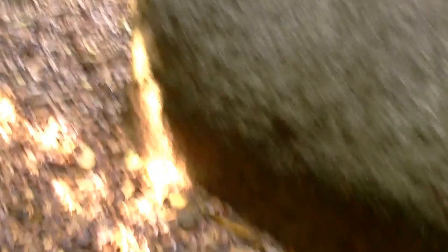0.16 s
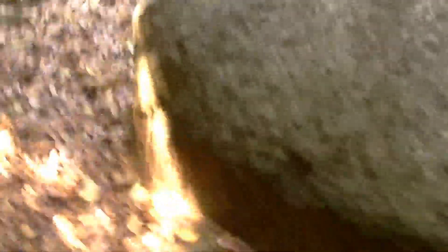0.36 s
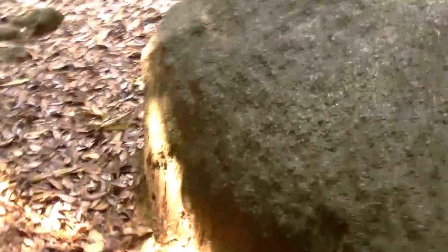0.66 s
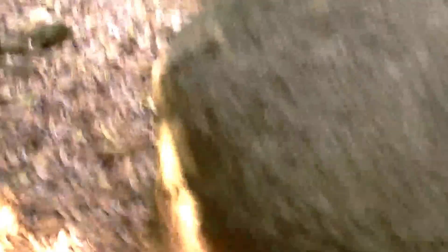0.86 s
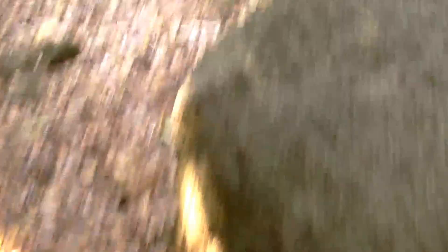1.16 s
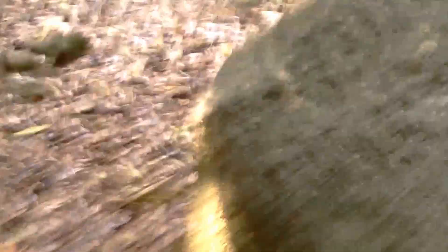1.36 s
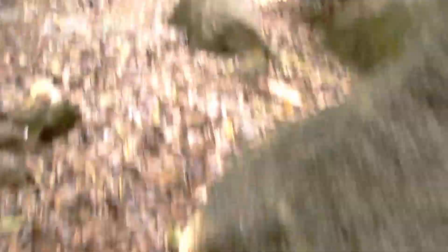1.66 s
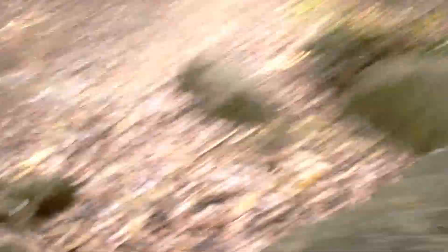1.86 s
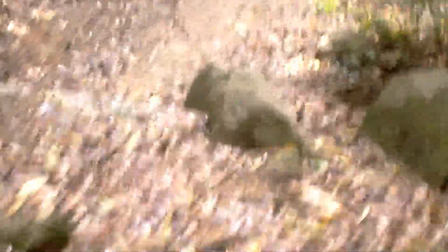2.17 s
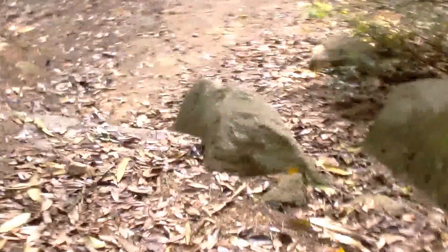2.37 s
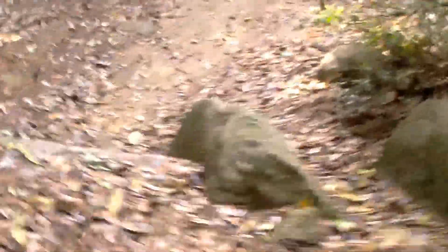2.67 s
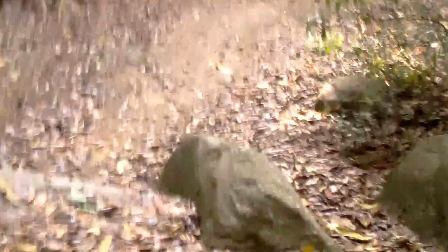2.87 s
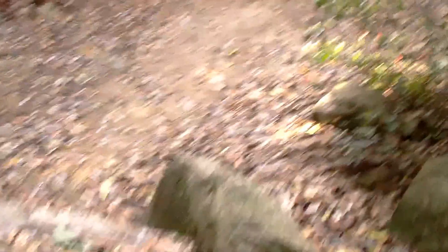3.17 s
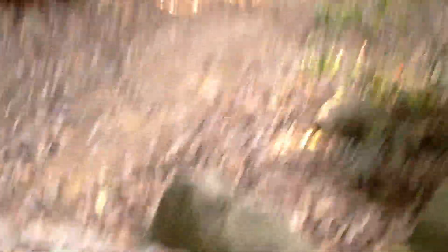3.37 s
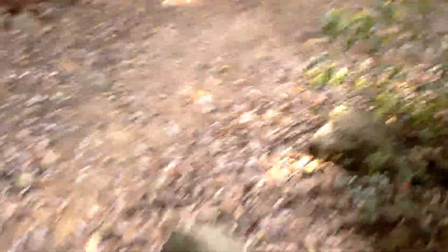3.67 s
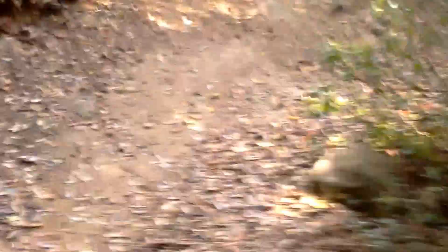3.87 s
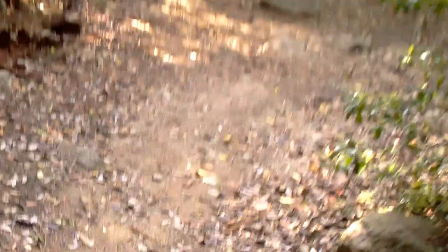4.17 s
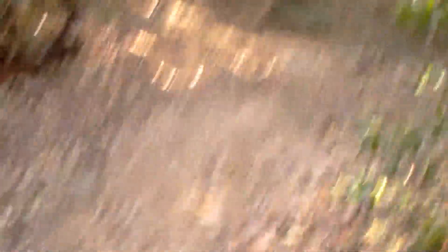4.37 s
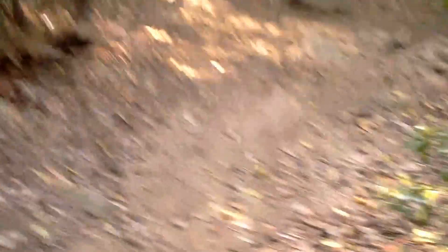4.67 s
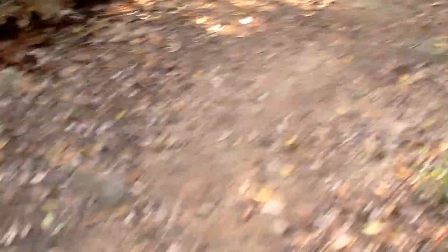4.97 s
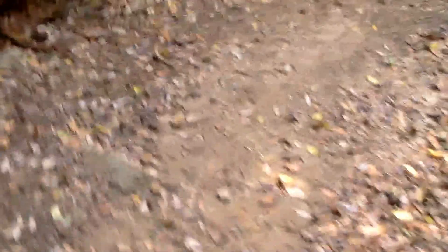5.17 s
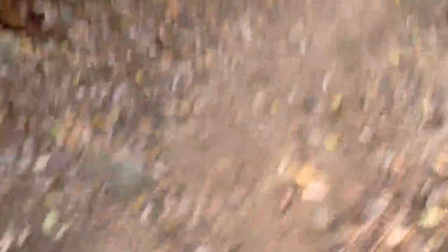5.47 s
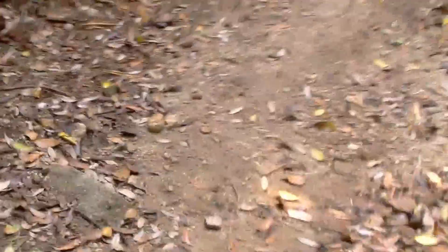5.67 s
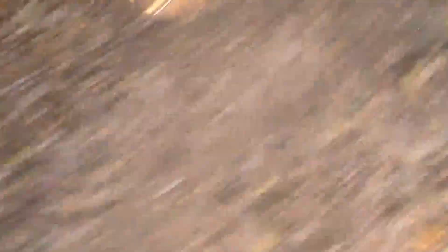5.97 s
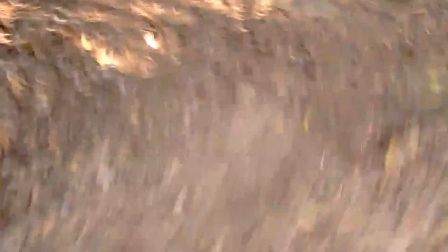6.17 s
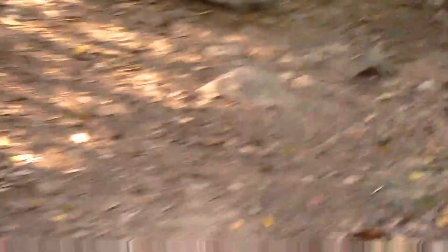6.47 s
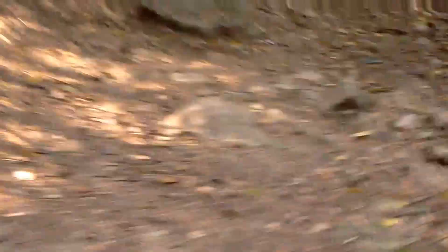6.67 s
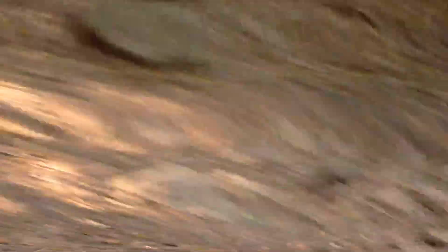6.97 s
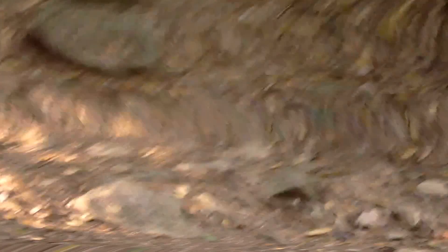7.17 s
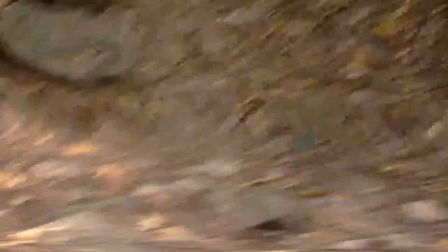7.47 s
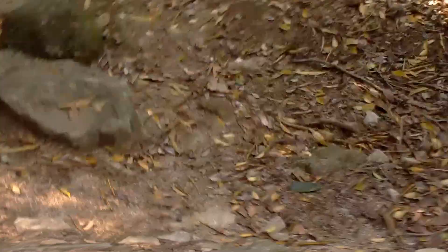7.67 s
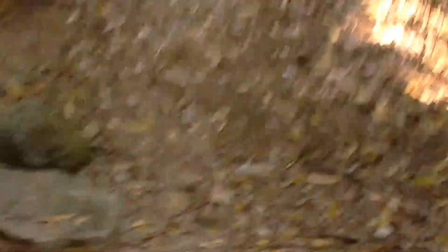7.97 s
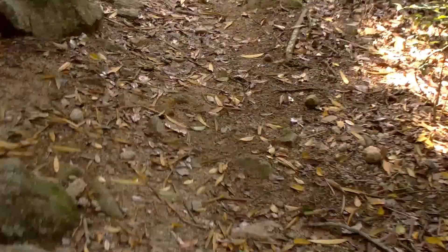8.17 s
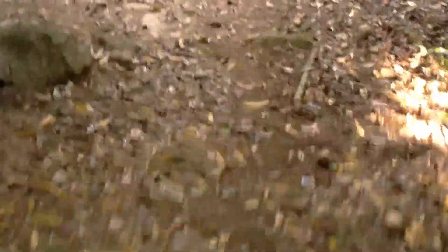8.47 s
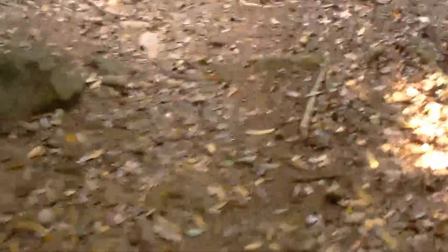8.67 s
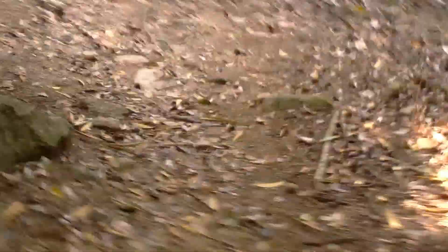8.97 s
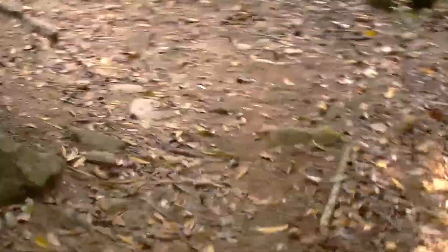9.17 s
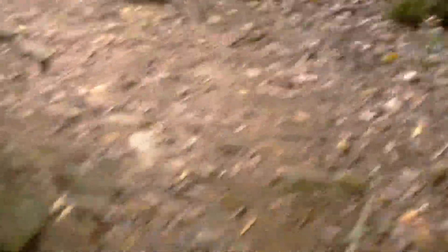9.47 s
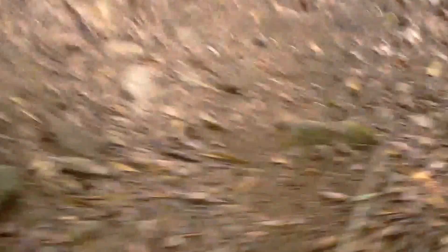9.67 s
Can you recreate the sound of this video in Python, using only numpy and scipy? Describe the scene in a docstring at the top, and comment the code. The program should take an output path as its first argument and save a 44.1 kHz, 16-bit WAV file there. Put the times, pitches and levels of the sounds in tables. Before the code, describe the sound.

A hand-held microphone moves just above walking feet in quiet woods. Steps are irregular, first sparse, then steady, crunching leaves and gritty soil with light scuffs between them. Stones knock and twigs tick. One short bird squeak comes early; distant chips come later, with a few tiny bright metallic rattles. The loudest stony steps land about two thirds through. Soft hush, low buffeting and a short, faint echo from the trees.

```python
"""A quick walk down a forest trail

Each sole thuds, grinds grit and crushes dry leaves, all built from clouds of tiny ringing fractures and noise.
Stones knock, twigs snap and a small piece of metal gear clinks: short dying bursts of coloured noise.
A bird squeaks once, from wavering harmonics and rasp; another chips further off, from brief tone pulses.
Filtered noise makes the hush of the wood and the rumble of air on the swinging hand-held microphone."""
import sys
import numpy as np
from scipy import signal
from scipy.fft import rfft, irfft, next_fast_len
from scipy.io import wavfile
from scipy.ndimage import uniform_filter1d

SR = 44100
rng = np.random.default_rng(int(sys.argv[2]) if len(sys.argv) > 2 else 0)


def file_out(sig):
    """Save sig as 16-bit WAV at sys.argv[1]."""
    # one column per channel
    cols = np.atleast_2d(sig).T
    # limit, then scale
    lim = np.clip(cols, -1, 1)
    pcm = np.round(lim * 32767).astype(np.int16)
    wavfile.write(sys.argv[1], SR, pcm)


N = 433061   # samples, about 9.8 s
TIME = np.arange(N) / SR   # seconds


def from_db(db):
    """Decibels to gain."""
    return 10 ** (np.asarray(db) / 20)


def rms_one(x):
    """Scale to unit rms."""
    return x / np.sqrt(np.mean(x ** 2) + 1e-20)


def in_time(rows):
    """Each column of a curve after the first (seconds), at every sample."""
    s, *columns = np.transpose(rows)
    return [np.interp(TIME, s, column) for column in columns]


def colour(x, points):
    """Filter x to a spectrum of (Hz, dB) points; minimum phase, so nothing sounds early."""
    length = x.shape[-1]
    size = 2 * next_fast_len(length // 2 + 2048)
    hz, db = np.transpose(points)
    bins_hz = np.arange(size // 2 + 1) * SR / size
    gain_db = np.interp(np.log(bins_hz + 1), np.log(hz), db)
    # folding the cepstrum turns the gain curve into a causal filter
    cepstrum = irfft(np.log(from_db(gain_db)))[:size // 2]
    cepstrum[1:] *= 2
    response = np.exp(rfft(cepstrum, size))
    return irfft(rfft(x, size) * response, size)[..., :length]


def drift(rate, at=TIME):
    """Smooth chance with spread 1 that takes a new random value rate times a second."""
    return rms_one(np.interp(at * rate, np.arange(12000), rng.standard_normal(12000)))


def ring(x, hz, sharpness):
    """Let x excite one resonance; a sharper one rings for more cycles."""
    return signal.lfilter(*signal.iirpeak(hz, sharpness, fs=SR), x)


def add(track, s, sound):
    """Mix a sound into a track at time s."""
    start = max(round(s * SR), 0)
    part = track[..., start:start + sound.shape[-1]]
    part += sound[..., :part.shape[-1]]


def stereo(mid, side):
    """Left and right from mid and side."""
    return np.array([mid + side, mid - side])


# Tone of the quiet wood. Each row: frequency in Hz, gain in dB.
HUSH_SPECTRUM = [(60, 2), (200, -2.5), (450, -4), (800, -10.5), (1700, -13.5), (2600, -11.5), (5500, -15),
                 (10500, -26), (16000, -25)]
# Tone of air on the microphone. Each row: frequency in Hz, gain in dB.
RUMBLE_SPECTRUM = [(10, -0.5), (22, 1), (38, 0), (52, -2), (75, -14), (130, -43), (400, -55)]


def background(sole_db):
    """The steady hush of the wood, and air buffeting the microphone, more as each step jolts it."""
    hush = rms_one(colour(rng.standard_normal((2, N)), HUSH_SPECTRUM))
    air = rms_one(colour(rng.standard_normal((2, N)), RUMBLE_SPECTRUM))
    jolt_db = uniform_filter1d(sole_db, size=5000)
    air = air * from_db(-37.5 + 0.36 * (jolt_db - jolt_db.mean()))
    return from_db(-48) * stereo(hush[0], 0.5 * hush[1]) + stereo(air[0], 0.15 * air[1])


WOOD_T60_S = 0.79   # time for the longer echo to fall by 60 dB


def wood(x, early_t60_s, late, width):
    """Trunks scatter a quick echo and a thin longer one, different on each side."""
    t = TIME[:SR]
    fading = from_db(-60 * t / early_t60_s) + late * from_db(-60 * t / WOOD_T60_S)
    echoes = rng.standard_normal((2, SR)) * fading * (t > .008)   # the first echo needs 8 ms
    energy = np.sum(echoes[0] ** 2)   # of the middle
    echoes = stereo(echoes[0], width * echoes[1])
    return signal.fftconvolve(x[None], echoes / np.sqrt(energy), axes=1)[:, :N]


# The other bird's chips. Each row: start in seconds, level in dB, pitch in Hz.
CHIP_NOTES = [(6.842, -18.5, 2250), (6.864, -21, 2350), (6.869, -19, 2220), (6.875, -27, 2400),
              (6.881, -29, 2300)]
# Its far calls, blurred by the trees. Each row: middle in seconds, level in dB before the wavering and trim.
BLURRED_CALLS = [(.39, -48.5), (5.22, -50), (6.86, -43.5), (7.19, -42), (8.22, -49)]


def other_bird(chip_s, call_hz, call_width_hz, call_s):
    """Clicking chips are brief tone pulses; from far away they smear into a narrow band of noise."""
    track, t = np.zeros(N), TIME[:SR // 20]
    pulse = (t / chip_s) ** 2 * np.exp(2 - 2 * t / chip_s)   # peaks at chip_s
    for s, db, hz in CHIP_NOTES:
        add(track, s, from_db(db) * pulse * np.sin(2 * np.pi * hz * t))
    edges_hz = [call_hz - call_width_hz / 2, call_hz + call_width_hz / 2]
    band = signal.butter(2, edges_hz, "band", fs=SR, output="sos")
    swell = sum(from_db(db) * np.exp(-((TIME - s) / call_s) ** 2) for s, db in BLURRED_CALLS)
    waver = from_db(9.6 * drift(110) - 3.5)
    return track + swell * waver * rms_one(signal.sosfilt(band, rng.standard_normal(N)))


# The near bird's squeak. Each row: time in seconds, pitch in Hz before the wavering,
# level in dB before flutter and trim, roughness from 0 to 1.
SQUEAK_CURVE = [(.41, 1516, -50.5, 0.2), (.433, 1720, -37, 0.17), (.453, 1767, -25, 0.15),
                (.47, 1818, -28, 0.03), (.487, 1844, -24.5, 0.05), (.497, 1585, -29, .5),
                (.51, 1293, -29, 0.55), (.525, 943, -36, 0.7), (.535, 850, -51, 0.7)]
# Tone of its throat. Each row: frequency in Hz, gain in dB.
THROAT_SPECTRUM = [(1700, -10), (2700, -13), (3650, 0.5), (4400, -3), (5400, -16.5), (7200, -12),
                   (9000, -23), (10900, -17), (12700, -38.5), (14600, -24)]


def near_bird():
    """A fluttering squeak rises and slides down hoarsely, its harmonics passing through the throat's peak."""
    pitch_hz, db, roughness = in_time(SQUEAK_CURVE)
    on = (TIME > SQUEAK_CURVE[0][0]) & (TIME < SQUEAK_CURVE[-1][0])
    waver = (0.007 + .025 * roughness) * drift(1100)
    pitch_hz = (pitch_hz * (1 + waver))[on]
    phase = 2 * np.pi * np.cumsum(pitch_hz) / SR
    throat_hz, throat_db = np.transpose(THROAT_SPECTRUM)
    voice = np.zeros(N)
    for k in range(2, 9):   # harmonics, without the fundamental
        voice[on] += from_db(np.interp(k * pitch_hz, throat_hz, throat_db)) * np.sin(k * phase)
    # air through the same throat
    rasp = rms_one(colour(rng.standard_normal(N), [(800, -45)] + list(THROAT_SPECTRUM))) * on
    flutter_db = 2.5 * np.sin(2 * np.pi * 64 * TIME)
    return (voice + .6 * roughness * rasp) * from_db(db + flutter_db + 1.2)


BIRD_LAG_S, BIRD_PAN_DB = .00003, 1.1   # the near bird sits a little to the left


def from_left(x):
    """The sound reaches the right port a little later and weaker."""
    late = np.interp(TIME - BIRD_LAG_S, TIME, x)
    return np.array([x, late]) * from_db([[BIRD_PAN_DB / 2], [-BIRD_PAN_DB / 2]])


# A tap on the hand-held body, close to its left port. One row: start in seconds, level in dB before colouring.
TAP = (6.279, -14)


def body_tap(decay_s):
    """A short dull burst of noise that reaches the left port only."""
    track, t = np.zeros(N), TIME[:SR // 10]
    add(track, TAP[0], from_db(TAP[1]) * np.exp(-t / decay_s))
    dull = [(100, -11), (450, 3), (1000, -14), (3000, -10), (8000, -33)]
    left = track * rms_one(colour(rng.standard_normal(N), dull))
    return np.array([left, 0 * left])


# Touches of the metal gear. Each row: start in seconds, level in dB before colouring and trim.
CLINK_TOUCHES = [(1.9722, -23.5), (7.117, -17), (7.125, -37), (8.1429, -25), (9.126, -22)]
# Tone of its rattle. Each row: frequency in Hz, gain in dB.
CLINK_SPECTRUM = [(6000, -14), (9700, -11), (10400, 1.5), (10650, -7), (10880, 6), (11200, -8.5),
                  (16000, -9)]


def clinks():
    """Each touch sets the small metal piece rattling brightly for a moment: noise through its resonances."""
    shake, t = np.zeros(N), TIME[:SR // 4]
    for s, db in CLINK_TOUCHES:
        add(shake, s, from_db(db) * (np.exp(-t / 0.0058) + 0.11 * np.exp(-t / 0.022)))
    return from_db(12.0) * colour(shake * rng.standard_normal(N), CLINK_SPECTRUM)


# Heels, stones and twigs. Each row: start in seconds, ring in Hz, then the levels in dB of
# thump, knock and crack, before each layer's trim.
CONTACTS = [(0.0148, 1770, -57, -44, -42), (0.124, 1300, -26.5, -21.5, -35.5),
            (0.163, 3120, -42.5, -32.5, -45), (0.1794, 12000, -62, -56.5, -53),
            (0.7656, 190, -37.5, -41, -69), (0.9902, 337, -38, -41, -37.5), (1.019, 1460, -42, -35.5, -50),
            (1.3264, 257, -29, -47.5, -46.5), (1.3465, 1180, -47, -28.5, -24.5),
            (1.6239, 3960, -68, -30.5, -41), (1.861, 1250, -30.5, -32, -28), (1.9255, 2400, -38, -32, -36),
            (2.3736, 720, -25.5, -22, -39), (2.484, 5500, -53.5, -42, -31.5),
            (2.777, 4050, -35.5, -32, -38), (3.1278, 415, -33.5, -40, -64), (3.3634, 1470, -30, -24, -39),
            (3.903, 442, -31, -38, -42), (4.0262, 1150, -45, -17.5, -37), (4.0797, 1410, -53, -24, -50.5),
            (4.1185, 12000, -56, -58, -42), (4.4992, 423, -35, -42, -38.5), (4.5593, 1220, -29, -28, -30),
            (5.007, 457, -27.5, -35, -42), (5.062, 1150, -36, -21.5, -29), (5.3768, 5660, -55, -66, -31),
            (5.4797, 2540, -47, -19.5, -25), (5.508, 212, -25.5, -25, -36), (5.899, 3400, -60, -36, -26.5),
            (5.9822, 3650, -63, -30.5, -26.5), (5.9944, 1710, -52.5, -28.5, -32.5),
            (6.1202, 3900, -51, -34.5, -42), (6.279, 470, -25.5, -20.5, -26), (6.3, 530, -23, -35, -44),
            (6.5093, 716, -24.5, -15, -19.5), (6.5292, 1140, -23, -16, -39), (6.621, 1070, -48, -28.5, -36),
            (6.7201, 375, -21, -46, -54), (6.9485, 900, -21, -18, -42), (7.4661, 770, -29, -27.5, -45),
            (7.5946, 766, -36, -22.5, -33), (7.6272, 960, -48, -30, -55), (8.029, 1120, -31.5, -25.5, -38),
            (8.57, 1090, -26, -26.5, -30), (8.9176, 9000, -56, -50, -35), (8.9572, 4500, -55.5, -51, -16.5),
            (9.0038, 1750, -48, -24.5, -26.5), (9.058, 1700, -35.5, -32, -32), (9.076, 620, -31, -32, -38),
            (9.2119, 370, -26, -22, -33), (9.271, 1910, -59.5, -38.5, -39), (9.371, 6000, -54, -43, -41),
            (9.5581, 1150, -24.5, -20.5, -46), (9.8081, 1770, -61, -34, -30)]


def blows(column, spectrum, first_s, scatter_s, scatter):
    """A sharp contact, then a spray of smaller ones as the ground gives; levels are rms over the first 10 ms."""
    track, t = np.zeros((2, N)), TIME[:4096]
    for row in CONTACTS:
        spray = rng.standard_normal((2, len(t))) * (np.exp(-t / first_s) + scatter * np.exp(-t / scatter_s))
        spray[:, 0] += 7   # the sharp contact
        spray += 3.75 * ring(spray, row[1], 4.5)   # the struck thing rings
        blow = colour(spray, spectrum)
        blow /= np.sqrt(np.sum(blow[:, :SR // 100] ** 2, axis=1, keepdims=True) / (SR // 100))
        add(track, row[0], blow * from_db(row[column]))
    return track


# Tones of the three kinds of contact. Each row: frequency in Hz, gain in dB.
THUMP_SPECTRUM = [(40, -7), (100, 0), (250, 1.5), (420, -2), (700, -8), (2000, -30.5)]
KNOCK_SPECTRUM = [(200, -26), (500, 0), (1100, 1), (1600, -4), (2400, -7), (4000, -17), (9000, -36)]
CRACK_SPECTRUM = [(1000, 2.5), (2400, 1), (3600, 5.5), (5200, 2.5), (7000, -5.5), (10500, -6), (16000, -11)]


def stones_and_twigs():
    """Heavy contacts thump, stones knock and twigs crack, the first burst of each shorter than the one before."""
    thump = blows(2, THUMP_SPECTRUM, first_s=0.0037, scatter_s=0.017, scatter=0.21)
    knock = blows(3, KNOCK_SPECTRUM, first_s=0.0035, scatter_s=0.012, scatter=0.28)
    crack = blows(4, CRACK_SPECTRUM, first_s=0.0029, scatter_s=0.014, scatter=0.22)
    return from_db(2.0) * thump + knock + from_db(1.5) * crack


# Footfalls, about two a second. Each row: time in seconds, rise in seconds, press in seconds, then levels in dB of
# sole thud, grit, leaves and the rustle under the standing foot, before each layer's offsets and unevenness.
FOOTFALLS = [(0.163, 0.012, 0.036, -43, -34.0, -35, -48.5), (1.309, 0.015, 0.027, -31, -29, -28.5, -47.0),
             (1.846, 0.035, 0.018, -25.5, -23.5, -24.5, -51.5),
             (2.319, 0.026, 0.056, -34, -29.0, -31.5, -45.0), (2.838, 0.03, 0.025, -46, -32.5, -28, -52.0),
             (3.331, 0.049, 0.108, -43.5, -32, -31.0, -45.5),
             (3.997, 0.047, 0.031, -33.5, -26.5, -27.5, -48.0), (4.556, 0.012, 0.033, -32, -24, -26, -50.5),
             (5.014, 0.029, 0.101, -35.5, -28.5, -32.5, -50.5),
             (5.474, 0.042, 0.046, -34.5, -31, -29.0, -48.0),
             (6.189, 0.01, 0.022, -31.5, -25.5, -22.5, -42.0),
             (6.506, 0.008, 0.046, -21, -18, -20.5, -42.0),
             (6.943, 0.031, 0.117, -32.5, -25.5, -28.5, -44.0),
             (7.461, 0.014, 0.075, -35.5, -27.5, -34.0, -46.0),
             (8.01, 0.045, 0.07, -53, -30.5, -34.5, -48.0), (8.493, 0.04, 0.116, -35.5, -32, -37.5, -50.5),
             (8.938, 0.03, 0.055, -29.5, -27.5, -24.5, -48.0),
             (9.559, 0.018, 0.035, -29.5, -23.5, -37.0, -42.0)]
# Lighter touches between them, as a toe pushes off or a shoe brushes by. Each row: middle in seconds,
# half length in seconds, then levels in dB of sole thud, grit and leaves, before unevenness and trim.
LIGHT_TOUCHES = [(0.089, 0.075, -44, -41.5, -47), (0.248, 0.025, -31.0, -39, -51.5),
                 (0.294, 0.015, -32.5, -41, -46.5), (0.695, 0.055, -50, -39, -54.5),
                 (0.985, 0.052, -39.5, -38, -50.5), (1.098, 0.046, -43, -46.5, -51.5),
                 (1.258, 0.034, -56.5, -39.5, -48.5), (1.415, 0.046, -31.5, -34.5, -34.0),
                 (1.511, 0.041, -37.0, -42, -44.5), (1.808, 0.024, -49, -40.5, -35.5),
                 (1.925, 0.038, -31, -36.5, -33.5), (2.101, 0.048, -40.5, -40.5, -40.5),
                 (2.424, 0.043, -39.5, -36, -33), (2.498, 0.011, -36.5, -37, -34.5),
                 (2.652, 0.026, -43, -39.5, -48.5), (2.795, 0.035, -53, -38, -35.0),
                 (2.965, 0.058, -43.5, -50, -41.5), (3.182, 0.042, -38.5, -37, -53.5),
                 (3.492, 0.028, -37, -39.5, -37.5), (3.571, 0.052, -40.5, -49, -40.5),
                 (3.712, 0.03, -45.5, -41.5, -53.0), (3.889, 0.032, -37, -35.0, -30.0),
                 (4.09, 0.043, -37.5, -46, -35.5), (4.357, 0.016, -54, -47, -48.0),
                 (4.666, 0.065, -32.5, -35, -42.5), (4.786, 0.042, -36, -43.5, -54.0),
                 (5.193, 0.035, -35.5, -52, -43.0), (5.63, 0.069, -50, -38, -40.5),
                 (5.817, 0.008, -49, -43.5, -45), (6.006, 0.046, -60, -55, -39.0),
                 (6.251, 0.027, -31, -26, -43), (6.366, 0.041, -33, -38, -51),
                 (6.625, 0.04, -48.0, -29, -31.5), (6.725, 0.022, -21.5, -30.0, -44.0),
                 (6.764, 0.014, -29, -31, -35.0), (7.138, 0.047, -24, -31.5, -37.0),
                 (7.318, 0.011, -31.5, -36.5, -52), (7.603, 0.02, -50, -28.0, -40.0),
                 (7.657, 0.035, -51, -40.5, -42.5), (7.82, 0.054, -41, -49, -54.0),
                 (8.145, 0.056, -37, -42, -40.0), (8.249, 0.021, -40.5, -52, -47.0),
                 (8.654, 0.049, -42, -45.5, -54.5), (9.085, 0.033, -44, -34, -40.0),
                 (9.152, 0.038, -47, -36.5, -36.5), (9.235, 0.032, -31.5, -38.0, -48.5),
                 (9.372, 0.035, -52, -42, -42.0), (9.687, 0.059, -31, -36, -55)]
# the crunch climbs RISE_DB in a step's rise time, sags as the litter packs down and dies as the foot comes to rest
RISE_DB, SAG_DB_PER_S, UNLOAD_DB_PER_S = 21, 21, 364.5
# the litter rustles on while the foot stands on it and falls still when it lifts
STANCE_S, LIFT_DB_PER_S = .7, 107


def tread(layer, rustle_db, rest_db, uneven_db, uneven_per_s):
    """Level in dB of a ground layer (0 sole, 1 grit, 2 leaves): steps load, press and rustle; scuffs swell and fade."""
    t = TIME[::20]   # a coarse clock is enough for levels
    power = from_db(rest_db) ** 2 + np.zeros(len(t))
    for s, rise_s, press_s, *layers_db, standing_db in FOOTFALLS:
        age = np.maximum(t - s, 0)
        load = RISE_DB * np.minimum(t - s, 0) / rise_s
        press = layers_db[layer] - SAG_DB_PER_S * age - UNLOAD_DB_PER_S * np.maximum(age - press_s, 0)
        rustle = standing_db + rustle_db - LIFT_DB_PER_S * np.maximum(age - STANCE_S, 0)
        power += from_db(load + press) ** 2 + from_db(load + rustle) ** 2
    for s, half_s, *layers_db in LIGHT_TOUCHES:
        power += (from_db(layers_db[layer]) * np.exp(-((t - s) / half_s) ** 2)) ** 2
    uneven = uneven_db * drift(uneven_per_s, t)   # the ground gives way unevenly
    return np.interp(TIME, t, 10 * np.log10(power) + uneven)


def crunch(level_db, spectrum, per_s, spread_db, clump_db, low_hz, high_hz, cycles, fine, patchy_db):
    """Tiny fractures clump, come faster under load and ring briefly at their own pitch. Returns mid and side."""
    rate = per_s * from_db((level_db - level_db.mean()) / 2)
    at = np.flatnonzero(rng.random(N) < rate / SR)
    count = len(at)
    chance = np.minimum(rng.exponential(1, count), 4)
    sizes = from_db(spread_db * chance + clump_db * drift(220, TIME[at]))
    sizes *= rng.choice([-1, 1], count)
    sizes = np.array([sizes, sizes * rng.standard_normal(count)])   # every fracture lies in its own direction
    pitches = np.geomspace(low_hz, high_hz, num=12)
    dealt = rng.integers(0, len(pitches), count)
    grains, clicks = np.zeros((2, N)), np.full((2, N), 1e-18)
    for k, hz in enumerate(pitches):
        # pieces of one size give way together, so the colour shifts as the foot rolls
        patches = from_db(patchy_db * drift(30, TIME[at]))
        clicks[:, at] = sizes * (dealt == k) * patches * np.sqrt(low_hz / hz)
        grains += ring(clicks, hz, cycles)
    # fine debris slides between the fractures
    grains = colour(rms_one(grains) + fine * rng.standard_normal((2, N)), spectrum)
    # even out the loudness over about 30 ms, then follow the tread
    power = uniform_filter1d(grains ** 2, size=1300)
    return grains / np.sqrt(np.abs(power) + 1e-12) * from_db(level_db)


def lone_ticks(leaf_db, per_s, spread_db):
    """Single leaf ribs and sprigs snap, more often and louder where more leaves are stirred."""
    track, t = np.zeros((2, N)), TIME[:SR // 40]
    stirred = np.cumsum(from_db(leaf_db / 2))
    for when, size, pitch in rng.random((int(per_s * N / SR), 3)):
        at = min(np.searchsorted(stirred, when * stirred[-1]), N - 1)
        snap = rng.standard_normal((2, len(t))) * (np.exp(-t / 0.00026) + 0.11 * np.exp(-t / 0.0069))
        snap = ring(snap, 1800 * 7 ** pitch, 1.2)
        snap_db = 0.7 * leaf_db[at] + 0.5 + spread_db * size ** 2
        add(track, at / SR, snap / np.abs(snap).max() * from_db(snap_db))
    return track


# Tones of the sole on soil, the grit and the leaves. Each row: frequency in Hz, gain in dB.
SOLE_SPECTRUM = [(40, -8.5), (80, -0.5), (130, -2), (230, -2), (380, 0.5), (520, -7), (1000, -37.5)]
GRIT_SPECTRUM = [(250, -24.5), (430, -2), (700, -2.5), (900, -1.5), (1150, -1), (1700, -2.5), (2300, -6),
                 (3200, -8), (6000, -30.5)]
LEAF_SPECTRUM = [(1200, -27.5), (2200, -2.5), (3200, -2), (5000, -2), (7000, -6), (10500, -4.5),
                 (13000, -2.5), (16000, -5.5)]
# Dry leaves are crisp, bare trodden soil is dull. Each row: time in seconds, treble over body in dB.
LEAF_DRYNESS = [(0, -4.5), (1.3, 3.5), (2.3, 1), (4.2, 4), (5.1, 1.5), (6.2, 6), (6.5, -1), (7.0, -1),
                (8.0, -2.5), (9.0, 1), (9.6, -3)]


def footsteps(sole_db, grit_db, leaf_db):
    """The sole pads on the soil, grit grinds under it and dry leaves crackle."""
    sole = crunch(sole_db, SOLE_SPECTRUM, per_s=300, spread_db=4, clump_db=2.5,
                  low_hz=79.8, high_hz=504, cycles=3.36, fine=0.22, patchy_db=3)
    grit = crunch(grit_db, GRIT_SPECTRUM, per_s=1100, spread_db=-1.5, clump_db=0.0,
                  low_hz=452, high_hz=2780, cycles=5.3, fine=1.0, patchy_db=3.5)
    leaves = crunch(leaf_db, LEAF_SPECTRUM, per_s=1500, spread_db=2.0, clump_db=2.0,
                    low_hz=2300, high_hz=13700, cycles=2.9, fine=0.67, patchy_db=2.0)
    leaves = leaves + lone_ticks(leaf_db, per_s=26, spread_db=7.0)
    treble = signal.sosfilt(signal.butter(3, 7500, "high", fs=SR, output="sos"), leaves)
    body = signal.sosfilt(signal.butter(3, 7500, fs=SR, output="sos"), leaves)
    [crisp_db] = in_time(LEAF_DRYNESS)
    leaves = body * from_db(-crisp_db / 2) + treble * from_db(crisp_db / 2)
    return from_db(-2.03) * sole + from_db(-1.87) * grit + from_db(-0.06) * leaves


# Width of the ground sounds. Each row: frequency in Hz, gain of the side signal in dB.
GROUND_WIDTH = [(100, -24), (400, -31), (1000, -59), (2500, -30), (5000, -15), (8000, -8.5), (14000, -5.5)]


def scene():
    """Feet just below the microphone, birds among the trees."""
    sole_db = tread(0, rustle_db=1.0, rest_db=-54, uneven_db=1.7, uneven_per_s=55)
    grit_db = tread(1, rustle_db=-.5, rest_db=-60, uneven_db=1.35, uneven_per_s=60)
    leaf_db = tread(2, rustle_db=-3.0, rest_db=-63, uneven_db=1.5, uneven_per_s=70)
    mid, side = footsteps(sole_db, grit_db, leaf_db) + stones_and_twigs()
    lean = colour(mid, [(3000, -47), (6000, -23), (10000, -19)])   # the treble is a little stronger on the left
    ground = stereo(mid, colour(side, GROUND_WIDTH) + lean)
    ground = ground + opposed(clinks())
    ground = ground + body_tap(decay_s=0.0056)
    squeak = near_bird()
    chips = other_bird(chip_s=0.0013, call_hz=2380, call_width_hz=320, call_s=0.045)
    ground_echo = wood(from_db(-17) * mid, early_t60_s=0.57, late=0.33, width=0.03)
    bird_echo = wood(from_db(-1.5) * squeak + from_db(-6) * chips, early_t60_s=.36, late=.22, width=.3)
    return ground + from_left(squeak) + chips + ground_echo + bird_echo + background(sole_db)


def opposed(x):
    """Left 1 dB up and right 1 dB down."""
    return x * from_db([[1], [-1]])


# Tone of the microphone's port, with a deep dip near 8 kHz. Each row: frequency in Hz, gain in dB.
PORT_SPECTRUM = [(310, 0), (362, 0.5), (420, 0), (530, 0), (710, 0.5), (5500, -1.5), (6900, -5),
                 (7800, -18.5), (8800, -5), (10400, -0.5), (16000, -4.5)]
CUTOFF_HZ = 16000


def record(dry):
    """The port colours the sound, the loudest peaks clip and the top is cut."""
    heard = np.clip(colour(dry, PORT_SPECTRUM), -1, 1)
    return signal.sosfilt(signal.ellip(10, .1, 70, CUTOFF_HZ, fs=SR, output="sos"), heard)


dry = scene()
out = record(dry)
file_out(out)
```